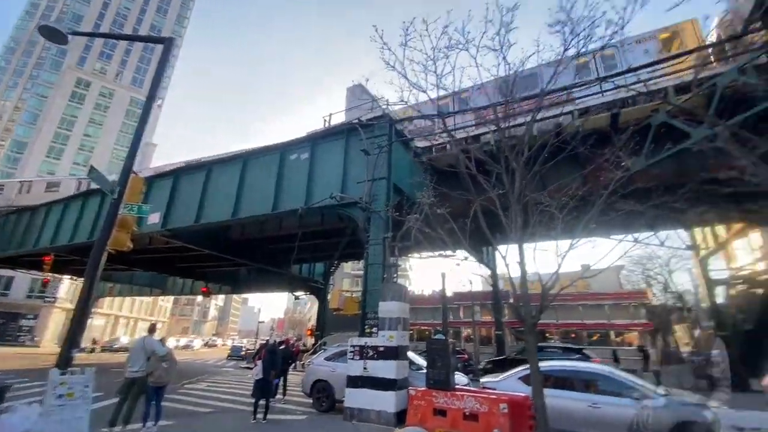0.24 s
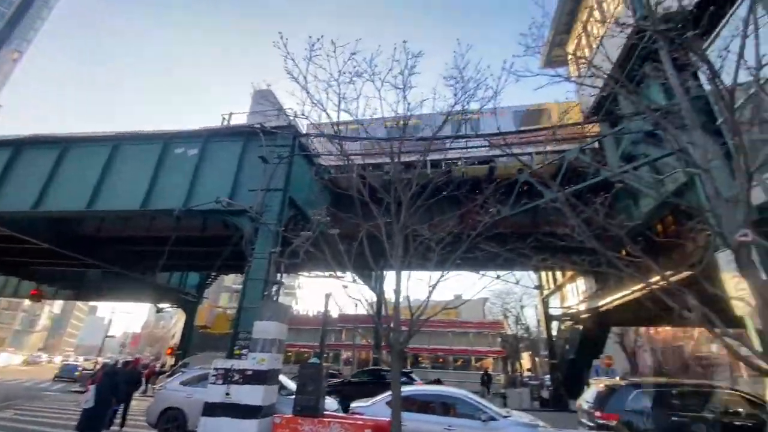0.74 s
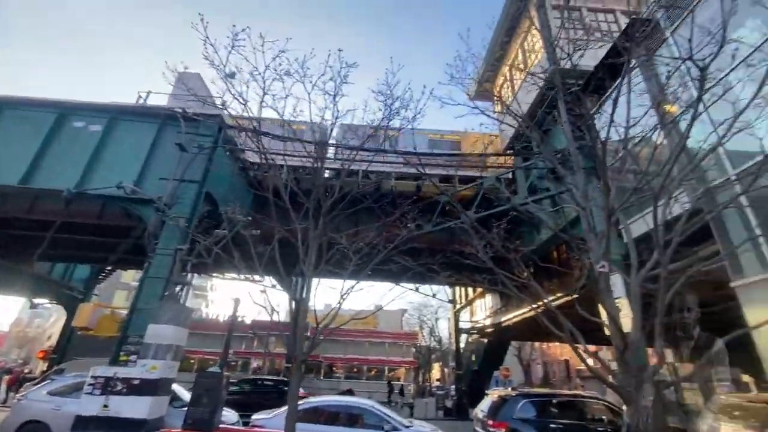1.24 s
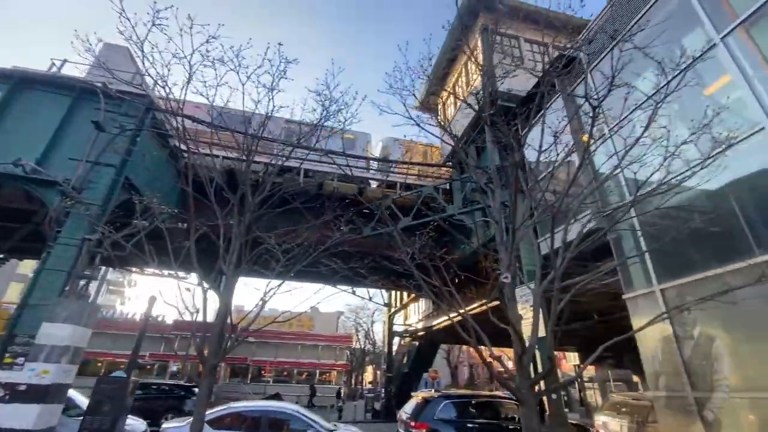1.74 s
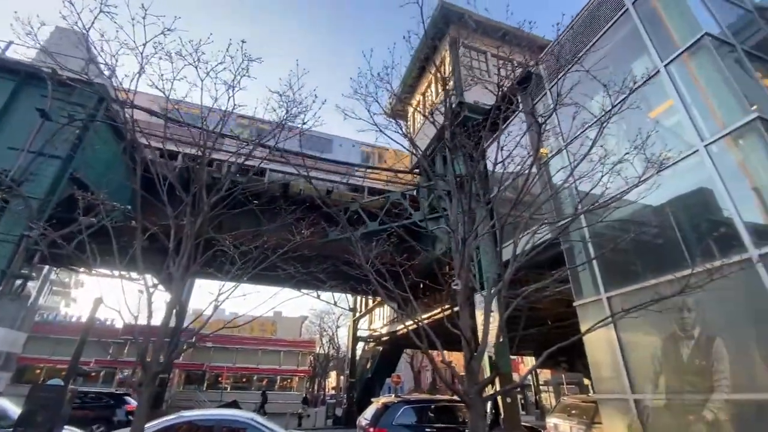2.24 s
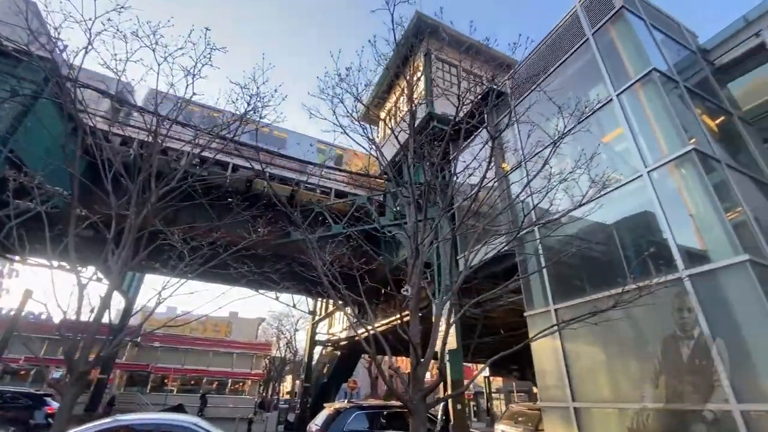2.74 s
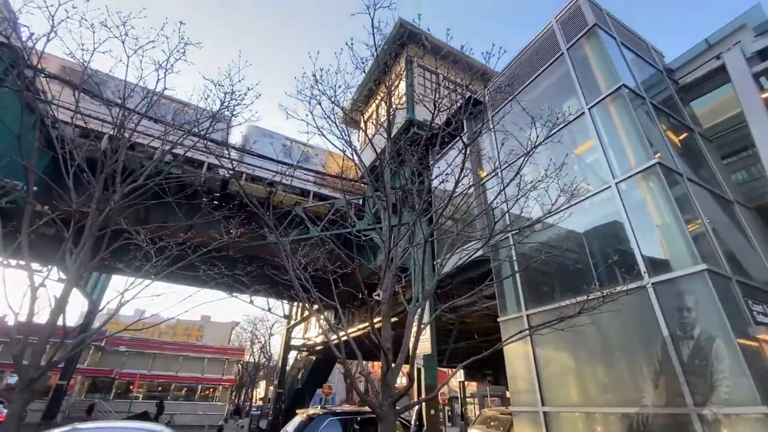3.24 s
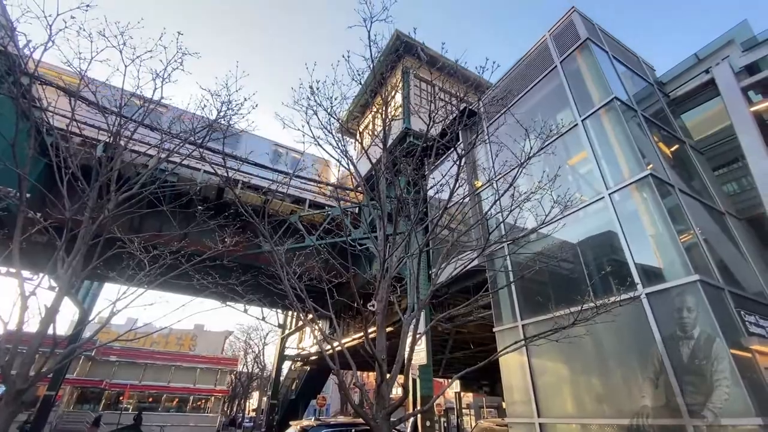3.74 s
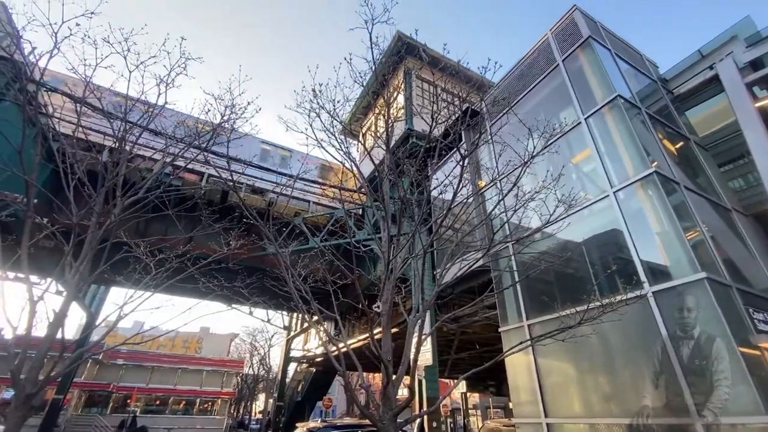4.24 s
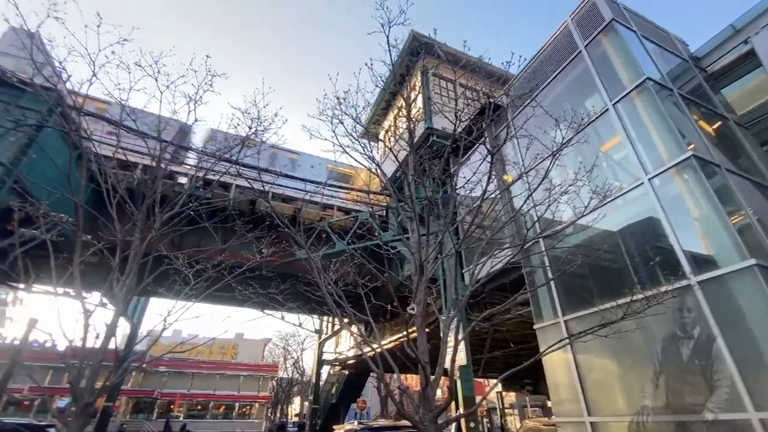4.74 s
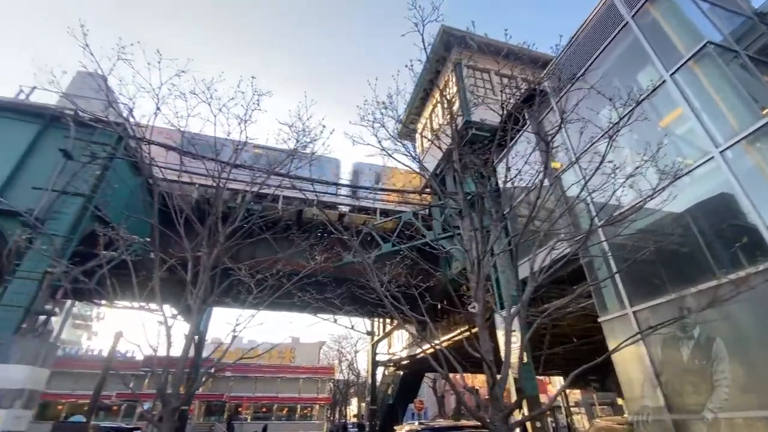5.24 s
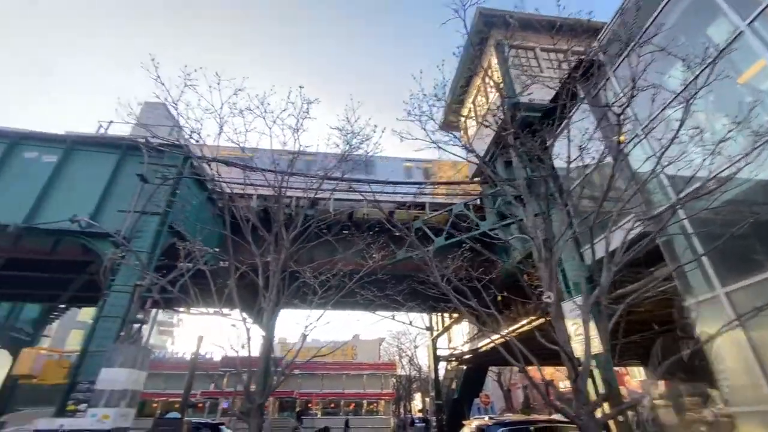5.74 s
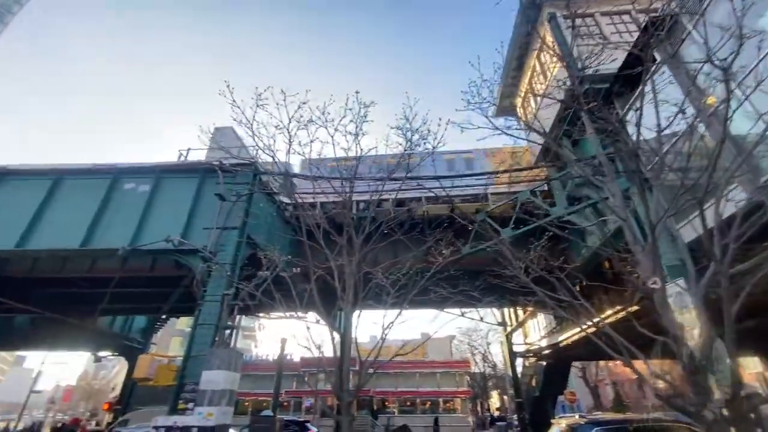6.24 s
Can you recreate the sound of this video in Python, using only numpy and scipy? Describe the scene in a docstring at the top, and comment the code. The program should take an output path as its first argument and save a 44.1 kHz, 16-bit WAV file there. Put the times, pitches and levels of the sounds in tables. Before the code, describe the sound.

A train is already rolling on the steel viaduct overhead at 0 s, heard from the pavement on a stereo phone. Deep girder boom, around 40 to 100 Hz, throbs unevenly beneath a rough midrange roar and a metallic rail hiss. Roughly every quarter second a wheel knock clatters through the deck, with short plate clangs, scraping and bright rattles of loose parts toward the right. Thin squeaks near 2 kHz and 4 to 6 kHz flicker from 0.2 to 0.9 s and recur later, with very high chinks. From 1 s everything grows steadily louder. Moderate bangs come near 1.2, 1.5 and 1.8 s; harder ones at 3.0 and 3.5 s, then around 4.8, 5.3 and 5.5 s. After about 5.4 s the level holds, the boom swelling strongest near 6 s with a brief dip, and knocks continue to the abrupt end around 6.4 s.

```python
"""On the pavement below a steel viaduct: a subway train rolls overhead, growing louder as one comes closer.
The girders boom in their low bending modes, and rough wheels on rough rail make a roar and a hiss.
About four times a second a wheel hammers the track, shaking loose fittings and ringing the steel.
Harder bangs, small chinks, flange squeaks and brief rings come on top; a phone with two ports picks it all up.
Noise from random tiny contacts, and wavering tones, are shaped by spectra, resonances and timed swells."""
import sys
import numpy as np
from scipy import signal
from scipy.fft import rfft, irfft, next_fast_len
from scipy.io import wavfile
from scipy.ndimage import uniform_filter1d

SR = 44100
rng = np.random.default_rng(int(sys.argv[2]) if len(sys.argv) > 2 else 0)


def wav_record(signal):
    """Record a signal, one row per channel, as 16-bit PCM in the file named by sys.argv[1]."""
    frames = np.transpose(np.atleast_2d(signal))
    bounded = np.clip(frames, -1, 1)
    # unit amplitude maps onto the largest positive 16-bit level
    quanta = np.round(bounded * 32767).astype(np.int16)
    wavfile.write(sys.argv[1], SR, quanta)


N = 286209
T = np.arange(N) / SR  # time in s
SIZE = 2 * next_fast_len(N // 2 + SR // 10)  # padded length for filtering
HZ = np.maximum(np.arange(SIZE // 2 + 1) * SR / SIZE, 1)  # frequency of each spectrum bin

PORTS = np.array([[1], [-1]])  # left and right
SPAN_S = 0.00048  # travel time from port to port
FRONT = 0.39  # share of the sound from all round that reaches both ports alike, from straight ahead
# how much earlier the left port hears a sound; negative means the right port is first
TRACK_LAG_S, RATTLE_LAG_S = 0.00045, -0.00029
DECK_LAG_S = 0.00037  # the deck is more nearly overhead than the wheels

# the walk towards the viaduct: sounds grow louder at a steady rate, then hold
APPROACH_START_S, APPROACH_END_S, RISE_DB_PER_S = 1, 5.435, 1.5

# knocks of a flat-spotted wheel, about one a turn, with levels relative to each layer's own:
# (time [s], length [s], blow [dB], ring of the steel [dB], rattle of loose parts [dB])
KNOCK_EVENTS = [(0.133, 0.11, -6, 0, 5.5), (0.446, 0.16, -3.5, -6, 3.5), (0.675, 0.086, -5, -1, 1.5),
                (0.946, 0.025, 2, -7, -1), (1.184, .11, -0.5, 0, 3), (1.476, 0.048, -1, -1, 3),
                (1.689, 0.16, 0.5, 0, 0), (1.923, 0.11, -4, -3, 0), (2.227, 0.17, -1.5, -1, 2),
                (2.46, 0.072, 0, 2, 4.5), (2.716, 0.076, -0.5, 0, -3), (2.956, 0.094, 1, 1, 2),
                (3.243, 0.019, 4, 1, 5), (3.45, 0.11, 1, 1.5, 1), (3.698, 0.13, 0, 0, 5.5),
                (4.01, 0.13, -0.5, 2.5, 2), (4.21, 0.087, -3.5, -1, -1), (4.492, 0.055, 1, -4, -1.5),
                (4.732, 0.13, 1.5, 1, 1.5), (5.019, 0.031, 1.5, -1, 0), (5.229, 0.13, 1, 3.5, 0),
                (5.453, 0.15, -1.5, 1.5, 4), (5.78, 0.1, -3.5, -5, 2), (6.016, 0.088, -0.5, 2, 5),
                (6.29, 0.11, -.5, -7, -3)]
# spectrum of the struck deck: (frequency [Hz], level per Hz [dB])
CLATTER_SPECTRUM = [(70, -46), (160, 6.5), (330, 7), (620, 5), (900, 1), (1400, -10.5), (2200, -14),
                    (3500, -23.5), (8000, -58)]


def undb(db):
    """Turn decibels into gain."""
    return 10 ** (np.asarray(db) / 20)


def unit(x):
    """Scale to rms 1."""
    return x / np.sqrt(np.mean(x ** 2))


def colour(points):
    """Gain over frequency, drawn through the few points of a spectrum."""
    hz, db = np.transpose(points)
    return undb(np.interp(np.log(HZ), np.log(hz), db))


def resonances(modes):
    """Gain over frequency of a set of damped modes: each peaks at its own pitch."""
    power = 0
    for hz, width, db in modes:
        detuning = (HZ ** 2 - hz ** 2) / (HZ * width)
        power = power + undb(db) ** 2 / (1 + detuning ** 2)
    return np.sqrt(power)


def filtered(x, gain):
    """Apply a gain over frequency to both channels."""
    return irfft(rfft(x, SIZE) * gain, SIZE)[:, :N]


def walk(rate):
    """Random drift of spread 1: straight lines between 2 * rate random points a second."""
    points = rng.standard_normal(1024)
    return unit(np.interp(T * 2 * rate, np.arange(len(points)), points))


def nearness(rise=RISE_DB_PER_S):
    """Gain over time as the viaduct comes closer; 1 at the nearest point."""
    return undb(rise * (np.clip(T, APPROACH_START_S, APPROACH_END_S) - APPROACH_END_S))


def impacts(per_s, spread_db):
    """Tiny contacts at random moments, of uneven size and either sign."""
    hit = np.flatnonzero(rng.random(N) < per_s / SR)
    size = rng.standard_exponential(N)[hit]
    sign = rng.choice([-1, 1], N)[hit]
    out = np.zeros(N)
    out[hit] = sign * undb(spread_db * np.minimum(size, 4))
    return unit(out)


def radiate(body, direct, per_s, spread_db, lag_s):
    """Contacts shake a body; a share `direct` comes from one side, the rest from ahead and all round."""
    straight, mid, side = (rfft(impacts(per_s, spread_db), SIZE) for _ in range(3))
    alike = FRONT + (1 - FRONT) * np.sinc(2 * HZ * SPAN_S)  # long waves reach both ports alike
    around = mid * np.sqrt((1 + alike) / 2) + PORTS * side * np.sqrt((1 - alike) / 2)
    straight = straight * np.exp(1j * np.pi * HZ * lag_s * PORTS)  # one port hears it first
    mixed = np.sqrt(direct) * straight + np.sqrt(1 - direct) * around
    return unit(irfft(body * mixed, SIZE)[:, :N])


def narrow(hz, width, t, lag_s):
    """One mode driven by friction or chatter, at both ports: its strength and phase wander."""
    steps = np.arange(4096)
    real, imag = rng.standard_normal((2, 3, len(steps)))
    sway = real + 1j * imag
    # the contact slips before the swing grows large
    sway = 2 * sway / np.sqrt(1 + np.abs(sway) ** 2) * np.sqrt(3 / 4)
    shared = sway[2] * np.exp(1j * np.pi * hz * lag_s * PORTS)
    at_ports = shared + sway[:2] / np.sqrt(2)
    carrier = np.exp(2j * np.pi * hz * t)
    return np.array([np.real(np.interp(t * 2 * width, steps, s) * carrier) for s in at_ports])


def ringing(modes, uneven_db, lag_s):
    """Chattering steel: several modes sound together, and the strength of each drifts."""
    total = 0
    for hz, width, db in modes:
        strength = undb(db + uneven_db * walk(5.4)) * np.sqrt(width)
        total = total + strength * narrow(hz, width, T, lag_s)
    return unit(total)


def jingling(low_hz=1500, high_hz=4400, t60=0.12, spread_db=1.9, count=1500):
    """Many metal parts each ring briefly at their own pitch, at random moments; t60 is in s."""
    age = np.arange(SR // 8) / SR
    out = np.zeros((2, N + len(age)))
    for when, pitch, size, turn in rng.random((count, 4)):
        hz = low_hz * (high_hz / low_hz) ** pitch
        start = int(when * N)
        fade = np.minimum(age / 0.0035, 1) * np.exp(-np.log(1000) * age / t60)
        gain = undb(spread_db * min(-np.log(1 - size), 3)) * (low_hz / hz) ** 1.02  # high parts are weaker
        # each part has its own direction, heard as a phase difference between the ports
        phases = np.pi * (turn - 0.5) * min(2 * hz * SPAN_S, 1) * PORTS
        out[:, start:start + len(age)] += gain * fade * np.sin(2 * np.pi * hz * age + phases)
    return unit(out[:, :N])


def hammering(strengths, rise_s, t60, flutter_db, events=KNOCK_EVENTS):
    """Level over time: each blow swells, holds for its length and dies away, with random flutter."""
    power = np.zeros(N)
    for (start, length, *_), gain in zip(events, undb(strengths)):
        part = slice(max(int(start * SR), 0), int((start + 1) * SR))
        age = T[part] - start
        swell = 1 - np.exp(-np.maximum(age, 0) / rise_s)
        fade = np.exp(-np.log(1000) * np.maximum(age - length, 0) / t60)
        power[part] += (gain * swell * fade) ** 2
    return np.sqrt(power) * undb(flutter_db * walk(22))


def girders(steadiness=0.64, left_db=-1.03, right_db=1.0, throb_db=1.0):
    """The weight of the cars keeps the low bending modes of the girders swinging; the boom throbs at random."""
    # bending modes: (frequency [Hz], width [Hz], level [dB])
    bending_modes = [(41.6, 12, -0.5), (55, 12, 4), (59, 6.8, 1), (70, 4.2, 3.5), (80.3, 15, 2.5),
                     (84, 11, -5)]
    # uneven swells and dips of the boom, before further throb and port balance: (time [s], level [dB])
    boom_levels = [(0, -26), (.2, -21.5), (.35, -26), (.8, -23), (.93, -32.5), (1.05, -24), (1.27, -21),
                   (1.33, -29), (1.42, -22.5), (1.55, -23), (1.61, -33), (1.7, -21.5), (1.87, -28.5),
                   (1.97, -19.5), (2.05, -22.5), (2.72, -20.5), (2.9, -21), (3.42, -20), (3.49, -25),
                   (3.56, -20), (4.1, -19), (4.65, -19.5), (5.55, -18), (6.04, -15), (6.15, -27.5),
                   (6.23, -15), (6.42, -24)]
    band_edges = np.sqrt((1 + (38 / HZ) ** 16) * (1 + (HZ / 100) ** 10))  # keeps about 38 to 100 Hz
    boom = radiate(resonances(bending_modes) / band_edges, 0.49, 3000, 5.15, TRACK_LAG_S)
    swing = np.abs(signal.hilbert(boom.mean(axis=0), SIZE)[:N])
    # a steady load evens out the swing
    boom = unit(boom / uniform_filter1d(swing + 0.061, SR // 10) ** steadiness)
    level_db = np.interp(T, *np.transpose(boom_levels)) + throb_db * walk(11)
    boom = boom * undb(level_db) * undb([[left_db], [right_db]])
    return filtered(boom, 1 / np.sqrt(1 + (38 / HZ) ** 20))  # little radiates below the lowest mode


def rolling(roar_db=-21.5, hiss_db=-35.5, jingle_db=-4.0, rail_rise_db_per_s=1.62):
    """Rough wheels on rough rail: the deck roars, the rails hiss, and bolts, clips and brake gear jingle."""
    # spectra of the deck and of the rail: (frequency [Hz], level per Hz [dB])
    deck_spectrum = [(20, -26), (32, -17), (60, 3), (115, -1), (200, -2), (370, -4.5), (520, -6.5),
                     (700, -8.5), (1000, -14), (1400, -17.5), (2200, -41), (5000, -93)]
    rail_spectrum = [(500, -19), (1300, -3.5), (2100, 3), (2450, -2), (3000, -2.5), (3500, -9.5),
                     (4150, -6), (5100, -10.5), (6800, -17), (8500, -26.5), (10000, -28), (15000, -76)]
    deck = radiate(colour(deck_spectrum), 0.45, 2500, 1.24, DECK_LAG_S) * undb(0.4 * walk(12))
    rail = radiate(colour(rail_spectrum), 0.21, 5000, 1.1, TRACK_LAG_S) * undb(1.1 * walk(14))
    hiss = rail + undb(jingle_db) * jingling()
    roar = undb(roar_db) * deck * nearness()
    return roar + undb(hiss_db) * hiss * nearness(rail_rise_db_per_s)


def squeaks_and_rings(rasp_db=-6.0, rasp_width_hz=220, chatter_db=1.8):
    """Flange squeaks, thin whistles and brief rings of wheel and fittings: tones that waver, rasp and flutter."""
    # flange squeaks and thin whistles, with brief rings of the wheel and the fittings at some knocks;
    # level at the nearest point, before flutter:
    # (time [s], length [s], pitch [Hz], level [dB], wander in pitch [Hz])
    tone_events = [(0, 0.79, 6432, -55, 35), (.22, 0.4, 4590, -43, 90), (.42, 0.13, 4690, -42, 60),
                   (.22, 0.64, 2155, -43, 42), (0.335, 0.082, 2170, -37, 26), (0.434, 0.11, 2180, -35, 30),
                   (0.657, 0.12, 2170, -34, 26), (.68, .1, 9350, -46, 45), (1.472, .11, 5500, -45, 42),
                   (1.475, 0.079, 4100, -40, 55), (1.71, 0.052, 4160, -35, 35),
                   (1.718, 0.091, 6050, -48, 60), (2.0, 0.83, 6400, -52, 35), (2.1, 2.4, 2135, -44, 75),
                   (2.472, 0.11, 7590, -44, 32), (2.478, 0.12, 9270, -49, 45), (2.58, 0.11, 2175, -37, 29),
                   (2.94, 0.11, 4150, -39, 40), (3.238, 0.06, 4150, -37, 20), (3.65, 0.08, 5830, -45, 35),
                   (3.75, 0.1, 5840, -39.5, 30), (3.808, .062, 4100, -38, 40), (4.12, 0.12, 5960, -51, 35),
                   (4.256, 0.14, 5900, -44, 50), (4.24, .09, 7090, -49, 26), (4.266, 0.12, 2180, -37, 22),
                   (4.757, 0.11, 2130, -38, 40), (4.81, 0.19, 5450, -46, 190), (4.86, 0.11, 3700, -45, 66),
                   (5.03, .07, 4170, -43, 45), (4.622, 1.2, 6440, -54, 28), (5.746, 0.45, 3970, -48, 35),
                   (5.602, .62, 6400, -52, 28)]
    out = np.zeros((2, N))
    waver = walk(70)
    for start, length, hz, db, width in tone_events:
        part = slice(*np.searchsorted(T, [start, start + length]))
        swell = np.sin(np.pi * (T[part] - start) / length)  # rises and fades
        tone = np.sin(2 * np.pi * np.cumsum(hz + width * waver[part]) / SR)
        rasp = undb(rasp_db) * narrow(hz, rasp_width_hz, T[part], 0)
        out[:, part] += undb(db) * swell * (tone + rasp)
    return out * undb(chatter_db * walk(30))


def chinks(rise_s=0.004, t60=0.2):
    """Some knocks toss a small loose steel part, which chinks high and briefly."""
    # modes of the part: (frequency [Hz], width [Hz], level [dB])
    part_modes = [(10800, 150, -12), (10878, 28, 0), (12930, 50, -14), (14790, 80, -16)]
    # chinks, level at the nearest point: (time [s], length [s], level [dB])
    chink_events = [(0.148, .04, -43), (1.19, .015, -48), (1.485, .02, -46), (1.728, .015, -44),
                    (2.517, .02, -49), (3.48, .055, -46), (3.81, .015, -50), (4.04, 0.019, -54.5),
                    (4.25, 0.049, -55), (4.74, .015, -58), (4.815, .015, -51), (5.26, .05, -45),
                    (5.55, .02, -49), (5.814, .02, -46), (6.08, .03, -45), (6.31, .02, -51)]
    levels_db = np.array(chink_events)[:, 2]
    ring = ringing(part_modes, 1.0, RATTLE_LAG_S)
    return ring * hammering(levels_db, rise_s, t60, 1.0, chink_events)


def ring_out(plates_db=-29.5, scrapes_db=-38.5):
    """Under each knock, plates of the deck clang and rail clips scrape, each briefly at its own pitch."""
    blow = np.array(KNOCK_EVENTS)[:, 2]
    plates = jingling(280, 850, 0.125, 1.5, count=420) * hammering(blow, 0.008, 0.25, 0)
    scrapes = jingling(1200, 3200, 0.1, 1.5, count=650) * hammering(blow, 0.015, 0.7, 0)
    return undb(plates_db) * plates + undb(scrapes_db) * scrapes


def bangs(rise_s=0.0025, t60=0.085):
    """A wheel drops hard onto the rail and jolts the deck at once; the bang dies away quickly."""
    # single bangs, level at the nearest point: (time [s], level [dB])
    drops = [(1.196, -21), (1.497, -22), (1.829, -20), (2.966, -20), (3.003, -13), (3.491, -11.5),
             (4.746, -17), (4.803, -19), (5.246, -16), (5.33, -19), (5.537, -15), (5.787, -19.5),
             (6.297, -20)]
    jolt = np.zeros(N)
    for start, db in drops:
        age = np.maximum(T - start, 0)
        jolt += undb(db) * (1 - np.exp(-age / rise_s)) * np.exp(-np.log(1000) * age / t60)
    return radiate(colour(CLATTER_SPECTRUM), 0.66, 6000, 0.48, DECK_LAG_S) * jolt


def knocks(clatter_db=-24.0, rasp_db=-41, rattle_db=-48, wheel_db=-44.0, fittings_db=-50.0,
           idle_db=-1.0, idle_ring_db=-10, idle_fade_db_per_s=0.22):
    """Each knock shakes the deck, grinds on the rail, rings the wheel and rattles loose parts to the right."""
    # a wheel grinding on the rail, and rattling loose parts: (frequency [Hz], level per Hz [dB])
    rasp_spectrum = [(600, -10), (1000, 10), (1400, -1), (1950, 5.5), (2400, -1.5), (3000, -3),
                     (3500, -5.5), (4500, -21.5), (5500, -10), (9000, -53)]
    rattle_spectrum = [(800, 0), (2200, -1), (4500, 10), (6500, 4), (7500, 5), (8300, 5), (10000, 5),
                       (12000, -2), (14500, 0)]
    # modes of the wheel and of the rail fittings: (frequency [Hz], width [Hz], level [dB])
    wheel_modes = [(4005, 45, -6), (4125, 50, -1), (4215, 45, -7), (4580, 170, -10), (5439, 35, -9),
                   (5831, 28, -6), (5930, 50, -8), (7090, 32, -10)]
    fitting_modes = [(7350, 160, -8), (7586, 35, -2), (7800, 120, -4), (8270, 70, -7), (9130, 90, -1),
                     (9272, 40, 2), (9390, 26, 1), (9843, 30, -5)]
    _, _, blow, steel, loose = np.transpose(KNOCK_EVENTS)

    clatter = radiate(colour(CLATTER_SPECTRUM), 0.29, 900, 0.98, DECK_LAG_S)
    clatter = clatter * hammering(blow, 0.0077, 0.33, 0.83)
    rasp = radiate(colour(rasp_spectrum), 0.3, 1400, 2.0, TRACK_LAG_S)
    rasp = rasp * hammering(blow, 0.015, 0.6, 1.2)

    # rolling alone keeps loose parts shivering between knocks; this grows a little slower than the rest
    idle = undb(idle_db + 1.0 * walk(9.7)) / nearness(idle_fade_db_per_s)
    idle_ring = undb(idle_ring_db) * idle
    rattle = radiate(colour(rattle_spectrum), 1.0, 4000, 0.9, RATTLE_LAG_S)
    rattle = rattle * np.hypot(hammering(loose, 0.0073, 0.27, 1.4), idle)
    wheel = ringing(wheel_modes, 1.8, 0)
    wheel = wheel * np.hypot(hammering(steel, 0.01, 0.3, 1.2), idle_ring)
    fittings = ringing(fitting_modes, 2.0, RATTLE_LAG_S)
    fittings = fittings * np.hypot(hammering(steel, 0.015, 0.36, 1.5), idle_ring)

    struck = undb(clatter_db) * clatter + undb(rasp_db) * rasp + undb(rattle_db) * rattle
    rung = undb(wheel_db) * wheel + undb(fittings_db) * fittings
    return (struck + rung) * nearness()


def scene():
    """The viaduct with the train on it."""
    steady = girders() + rolling()
    accents = (squeaks_and_rings() + chinks() + ring_out() + bangs()) * nearness()
    return steady + accents + knocks()


def record(dry):
    """The two ports colour the sound a little differently; the phone cuts the top."""
    # the right port against the left: (frequency [Hz], level [dB])
    port_tilt = [(130, 3.5), (260, 2), (500, 0), (900, -2), (1550, 3), (2200, -.5), (4200, 0.5),
                 (10000, 0.1)]
    top_hz = 15100
    tilt = colour([(90, 0)] + list(port_tilt)) ** 0.5  # half of the difference goes to each port
    ends = np.clip(np.minimum(T, T[-1] - T) / 0.003, 0, 1)  # short fades in and out
    heard = filtered(dry, np.array([1 / tilt, tilt])) * ends
    return signal.sosfilt(signal.ellip(8, 0.2, 70, top_hz, fs=SR, output="sos"), heard)


dry = scene()
out = record(dry)
wav_record(out)
```